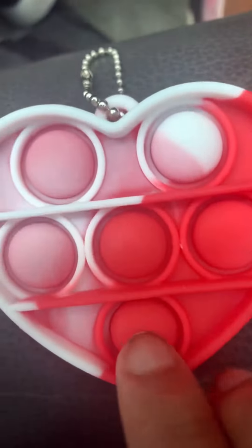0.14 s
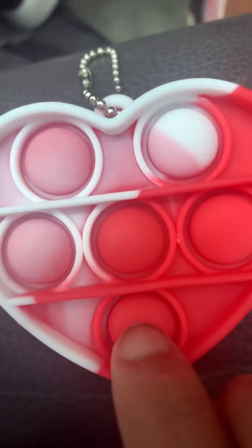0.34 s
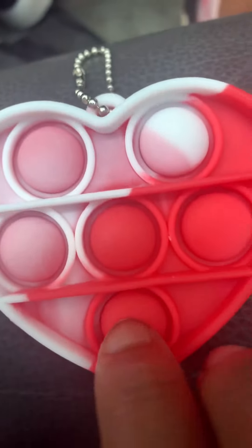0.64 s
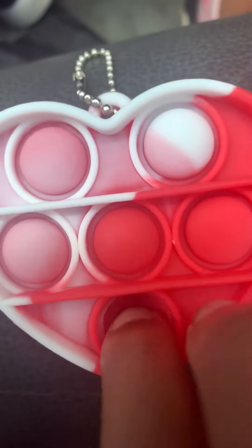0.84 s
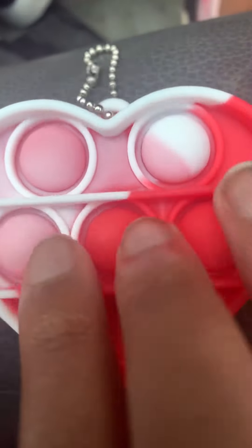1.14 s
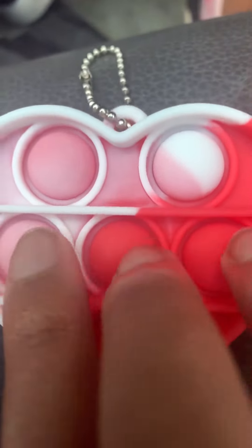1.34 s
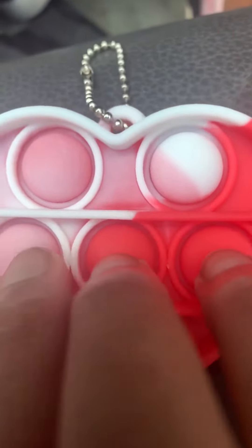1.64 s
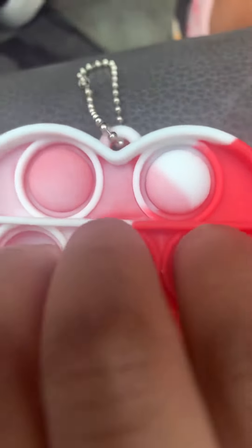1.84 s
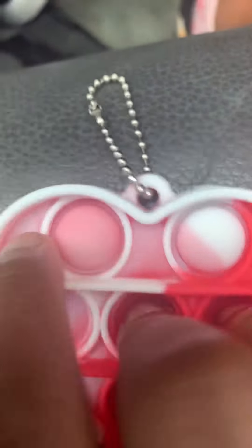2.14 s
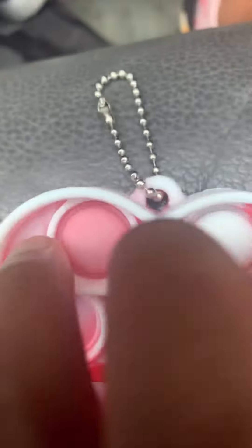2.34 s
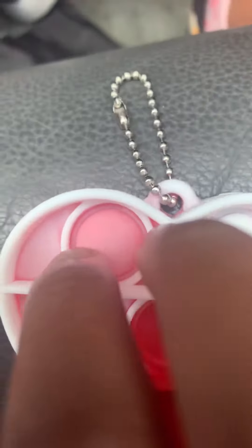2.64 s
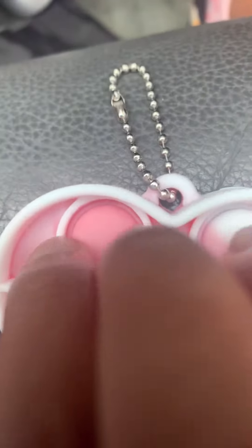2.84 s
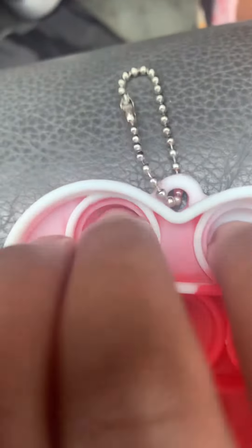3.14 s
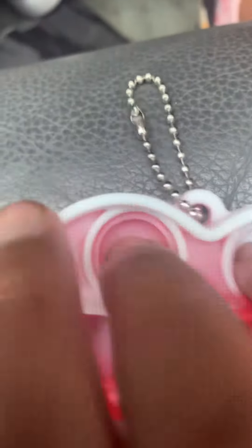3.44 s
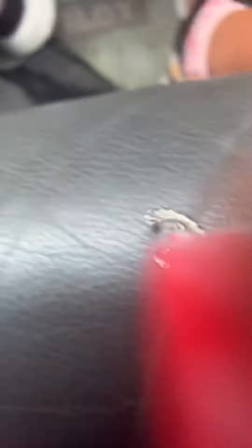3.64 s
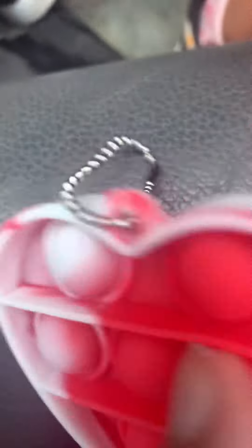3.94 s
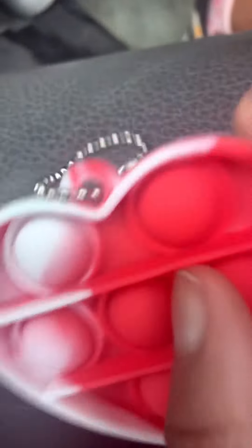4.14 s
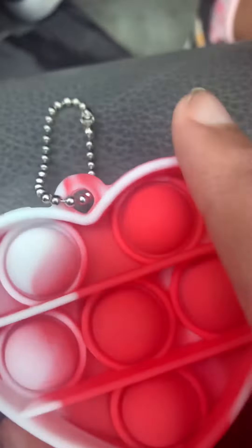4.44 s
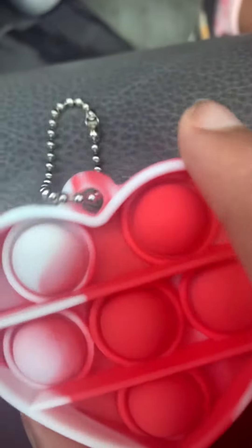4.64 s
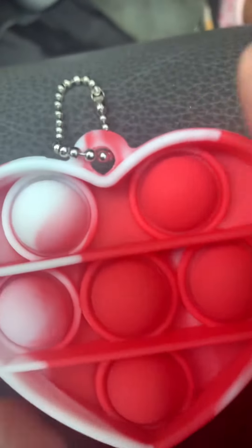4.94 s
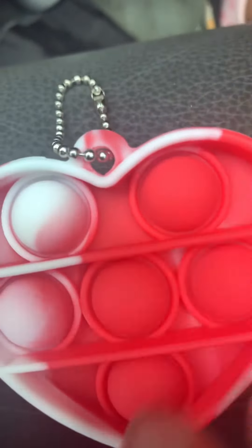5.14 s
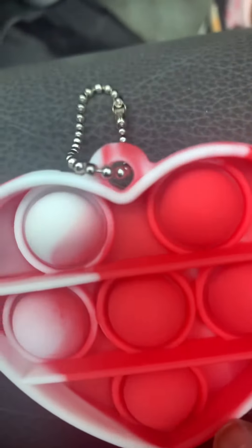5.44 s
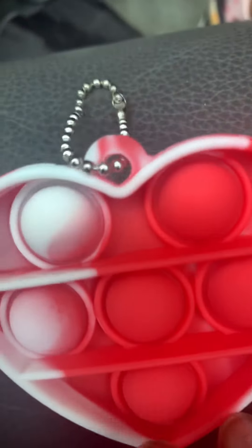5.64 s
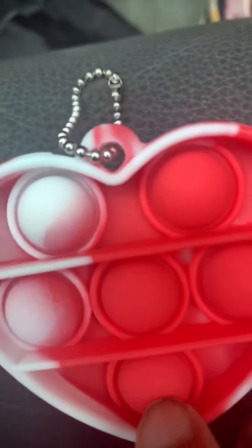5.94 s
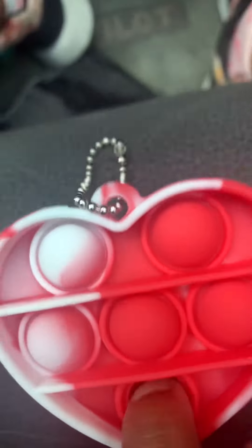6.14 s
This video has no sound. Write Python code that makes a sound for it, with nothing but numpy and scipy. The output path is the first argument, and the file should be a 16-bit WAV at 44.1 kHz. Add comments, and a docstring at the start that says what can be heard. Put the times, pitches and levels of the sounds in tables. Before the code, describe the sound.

Inside an idling car, a loud, low engine hum drones steadily over body rumble and soft vent air. Close to the microphone, fingers pop the bubbles of a silicone fidget toy: one sharp snap, a tight cluster a second later, then a quick pair. After that come only handling sounds, with faint finger rubs, soft knocks and single dry ticks from the toy's bead chain.

```python
"""Fingers pop the bubbles of a silicone fidget toy, close up in an idling car.
Each dome gives, then flips with a snap that rings its little cup and thumps the soft slab.
Between pops the fingers rub the toy, it knocks softly and its bead chain ticks.
Underneath, the engine's firings boom in the cabin over body rumble and vent air."""
import sys
import numpy as np
from scipy import signal
from scipy.fft import rfft, irfft
from scipy.io import wavfile
from scipy.ndimage import uniform_filter1d, minimum_filter1d

SR = 44100
rng = np.random.default_rng(int(sys.argv[2]) if len(sys.argv) > 2 else 0)


def int16_out(signal):
    """Quantize to a 16-bit WAV file."""
    q = np.round(np.clip(np.atleast_2d(signal).T, -1, 1) * 32767)
    wavfile.write(sys.argv[1], SR, q.astype(np.int16))


N = 277389

# Colours of the bed, body rumble and vent air: f/Hz, relative level/dB
RUMBLE_COLOUR = [(20, -27), (35, -11), (55, -7), (90, 2), (130, 0.5), (200, -8.5), (275, -7.5), (340, -10),
                 (450, -16.5), (700, -40.5)]
VENT_COLOUR = [(200, -4), (450, -3), (580, -5), (720, 1), (850, -6), (1000, -5.5), (1220, -10.5),
               (1560, -6.5), (2100, -12.5), (2800, -12.5), (3800, -19.5), (6800, -26), (7500, -23),
               (8000, -29), (11000, -36.5), (13500, -49)]
# Firing rate at idle: t/s, f/Hz
FIRING_RATE = [(0, 37.13), (2.3, 37.15), (2.9, 37.35), (3.6, 37.28), (5.0, 37.25), (6.3, 37.16)]
# Engine orders from the second up: level/dB re BOOM_DB, waver/share of amplitude
BOOM_ORDERS = [(-10.5, 0.26), (1, 0.025), (-8.5, 0.095), (-17, 0.053), (-25, 0.07), (-26.5, 0.5)]
# Air resonances of the cabin: f/Hz, width/Hz
AIR_MODES = [(112, 9.4), (205, 7.1)]
# Colour of the cabin's tail: f/Hz, relative level/dB
TAIL_COLOUR = [(200, 7.5), (2500, -9.5), (7000, -1.5), (14000, -1.5)]

# Finger swishes: peak t/s, half length/s, level/dB, centre f/Hz
SWISHES = [(0.063, 0.06, -52, 7960), (0.19, 0.036, -58.5, 8500), (0.302, 0.021, -61, 9500),
           (2.594, 0.12, -65, 8900), (3.661, 0.02, -53, 6500), (3.689, 0.077, -61, 7500),
           (4.123, 0.056, -46, 2500), (5.1, .07, -67, 9000)]
# Colour of a swish: f/centre f, relative level/dB
SWISH_COLOUR = [(1 / 8, -45), (1 / 2, -8), (1, 0), (1.4, -7), (2, -30), (5, -50)]
# Bead chain ticks: t/s, level/dB
CHAIN_TICKS = [(1.3146, -29), (2.6385, -29), (3.9620, -24.5), (4.1945, -33.5), (5.2855, -19)]
# Soft knocks: t/s, level/dB, t60/s, thud/dB re pat
KNOCKS = [(.9135, -37.5, 0.022, 4), (1.129, -38.5, 0.026, -12), (3.8474, -36, 0.066, 5.5),
          (5.8055, -34, 0.03, -10)]
# Colours of a tick and of a knock's pat and thud: f/Hz, relative level/dB
TICK_COLOUR = [(500, -36), (2000, 7), (5000, 6.5), (9000, 0.5), (13000, -9.5), (15500, -12.5)]
PAT_COLOUR = [(800, -21), (2000, -9), (2600, 4), (3600, -3.5), (5000, -12.5), (9000, -22.5),
              (14000, -45.5)]
THUD_COLOUR = [(150, -14), (480, 10), (900, -17), (4000, -57)]

# The other cups ringing along: f/Hz, t60/s, level/dB re pop
OTHER_CUPS = [(1598, 0.013, -9), (2260, 0.052, -22.5), (3160, 0.0096, -14.5), (6300, 0.012, -20)]
# Colours of the dome's crack and the slack wall's flap: f/Hz, relative level/dB
CRACK_COLOUR = [(300, -11.5), (1100, -6.5), (1700, -14), (2900, -8), (3500, 5.5), (4800, 2), (5700, -2.5),
                (7000, -1.5), (8500, -7.5), (11000, -10.5), (15000, -28)]
FLAP_COLOUR = [(150, -18), (290, -3), (600, 4.5), (1000, -11), (2000, -18)]
# Pops: t/s, level/dB, cup f/Hz, cup t60/s, trims (give/dB, overtone/dB, thump/dB, crack/dB), high cut/Hz
BUBBLE_POPS = [(0.7428, -1.5, 2410, .012, -11, -15, -16, 3, 6550),
               (1.741, -4.5, 2410, 0.013, -5, -10, -12, -0.5, 8000),
               (1.7498, -4, 2470, 0.015, -8.5, -21, -13, -9, 9600),
               (1.7643, 1, 2350, 0.011, -13, -3.5, -12.5, -2, 7600),
               (3.028, -8.5, 2520, 0.01, 3, 8, -8, 5, 10000),
               (3.1331, -4.5, 2450, 0.0073, -19, -12, -8.5, -4, 11200)]

BOOM_DB, SHUDDER_DB, FAN_DB = -17, -36.5, -41
BEAT_S, IN_STEP_S = 1.32, 1.27  # one beat of shudder against fan; a moment when they are in step
GIVE_S, GIVE_DULLING = 0.00238, 0.78  # the give leads the flip, with this share of its high cut
TOP_HZ = 15700


def undb(db):
    """Decibels to gain."""
    return 10 ** (np.asarray(db) / 20)


def unit(x):
    """Scale to rms 1."""
    return x / np.sqrt(np.mean(x ** 2))


def add(out, at, sound):
    """Mix a sound in at a time in seconds."""
    i = int(at * SR)
    out[i:i + len(sound)] += sound[:len(out) - i]


def colour_db(points, size):
    """An EQ curve through (f/Hz, level/dB) points, on FFT bins."""
    hz, db = np.transpose(points)
    return np.interp(np.log(np.arange(size // 2 + 1) * SR / size + 1), np.log(hz), db)


def noise(points, size):
    """Coloured noise, rms 1."""
    return unit(irfft(rfft(rng.standard_normal(size)) * undb(colour_db(points, size)), size))


def click(points, size=512):
    """The tightest causal click of a given colour, peak 1."""
    cepstrum = irfft(np.log(undb(colour_db(points, size))))
    cepstrum[1:size // 2] *= 2  # fold to minimum phase
    cepstrum[size // 2 + 1:] = 0
    pulse = irfft(np.exp(rfft(cepstrum)))
    return pulse / np.abs(pulse).max()


def drift(rate):
    """Smooth random modulation, about rate moves a second, rms 1."""
    hold = int(SR / rate)
    steps = np.repeat(rng.standard_normal(N // hold + 1), hold)
    return unit(uniform_filter1d(uniform_filter1d(steps, hold), hold)[:N])


def fade(t, t60):
    """Exponential decay that loses 60 dB in t60."""
    return np.exp(-np.log(1000) * t / t60)


def ring(t, hz, t60):
    """One struck mode."""
    return np.sin(2 * np.pi * hz * t) * fade(t, t60)


def cabin_air(rumble_db=-28, waver_db=1, vent_db=-41.5, glass_db=-12, glass_t60=.03):
    """The bed: body rumble and the even rush of the vents, coloured by reflections off the windows."""
    t = np.arange(4096) / SR
    rumble = noise(RUMBLE_COLOUR + [(3000, -100)], N) * undb(rumble_db + waver_db * drift(25))
    rush = noise(VENT_COLOUR + [(15000, -65)], N)
    glass = rng.standard_normal(len(t)) * fade(t, glass_t60) * (1 - fade(t, glass_t60))
    rush += undb(glass_db) * unit(signal.fftconvolve(rush, glass)[:N])
    return rumble + unit(rush) * undb(vent_db)


def engine():
    """The cabin passes only the low orders of the firings; the third booms on an air resonance."""
    t = np.arange(N) / SR
    rate = np.interp(t, *np.transpose(FIRING_RATE))
    turns = np.cumsum(rate) / SR + 0.0012 * drift(8.1)  # firings come slightly early or late
    # the shudder beats with a slightly slower shake, perhaps the radiator fan
    fan_turns = turns - (t - IN_STEP_S) / BEAT_S
    out = undb(SHUDDER_DB) * np.sin(2 * np.pi * turns) + undb(FAN_DB) * np.sin(2 * np.pi * fan_turns)
    for order, (db, waver) in enumerate(BOOM_ORDERS, 2):
        hz = order * rate.mean()
        # orders above a resonance trail those below it
        lag = sum(np.arctan2(hz * width, mode_hz ** 2 - hz ** 2) for mode_hz, width in AIR_MODES)
        level = undb(BOOM_DB + db) * (1 + waver * drift(7))
        out += level * np.sin(2 * np.pi * order * turns - lag)
    return np.sqrt(2) * out


def cabin_reverb(x, echo_s=.004, echo_db=-11, tail_db=-15, tail_t60=0.076):
    """One early reflection, then the short tail of an upholstered space."""
    t = np.arange(8192) / SR
    response = noise(TAIL_COLOUR, len(t)) * fade(t, tail_t60) * (1 - fade(t, 0.01))
    response *= undb(tail_db) / np.sqrt(np.sum(response ** 2))
    add(response, echo_s, undb(echo_db) * np.array([1, 2, 1]) / 4)
    return x + signal.fftconvolve(x, response)[:N]


def finger_rubs(grain_db=2.5):
    """Skin slides on silicone in soft, grainy swishes."""
    out = np.zeros(N)
    for at, half_s, db, hz in SWISHES:
        size = int(2 * half_s * SR)
        swish = noise([(hz * ratio, level) for ratio, level in SWISH_COLOUR], size)
        grain = undb(grain_db * rng.standard_normal(size // 32 + 1)).repeat(32)[:size]
        envelope = np.hanning(size) * uniform_filter1d(grain, 32)
        add(out, max(at - half_s, 0), undb(db) * envelope * swish)
    return out


def toy_knocks():
    """The soft toy knocks on leather or a finger: a bright pat over a low thud."""
    out, t = np.zeros(N), np.arange(4096) / SR
    for at, db, t60, thud_db in KNOCKS:
        pat = noise(PAT_COLOUR, len(t))
        thud = undb(thud_db) * noise(THUD_COLOUR, len(t))
        envelope = fade(t, t60) * (1 - fade(t, 0.002))
        add(out, at, undb(db) * envelope * (pat + thud))
    return out


def bead_chain():
    """The beads strike in single dry ticks."""
    out = np.zeros(N)
    for at, db in CHAIN_TICKS:
        add(out, at, undb(db) * click(TICK_COLOUR))
    return out


def dive(t, start_hz, end_hz, glide_s, t60):
    """A struck mode whose pitch sinks as the rubber slackens."""
    turns = end_hz * t + (start_hz - end_hz) * glide_s * (1 - np.exp(-t / glide_s))
    return np.sin(2 * np.pi * turns) * fade(t, t60)


def soften(x, hz):
    """High cut: a slower flip under the fingertip sounds duller."""
    return signal.sosfilt(signal.butter(4, min(hz, TOP_HZ), fs=SR, output="sos"), x)


def bubble_pops(stretch=1.09, overtone_ratio=1.62, rasp_db=-7, give_crack_db=-6,
                wall_db=-3, flap_db=-9, slab_db=-19):
    """A dome gives, then flips with a crack and rings the air in its cup; wall and slab add weight."""
    out, t = np.zeros(N), np.arange(4096) / SR
    wall = undb(wall_db) * dive(t, start_hz=1556, end_hz=400, glide_s=0.00273, t60=0.039)
    wall *= 1 - fade(t, 0.0092)  # soft attack
    other_cups = sum(undb(db) * ring(t, hz, t60) for hz, t60, db in OTHER_CUPS)
    slab = undb(slab_db) * ring(t, hz=288, t60=0.043)
    for at, db, hz, t60, give_db, overtone_db, thump_db, crack_db, top_hz in BUBBLE_POPS:
        cup = dive(t, hz * stretch, hz, glide_s=0.002, t60=t60)
        cup += undb(overtone_db) * ring(t, hz * overtone_ratio, t60=0.008)
        crack = undb(rasp_db) * noise(CRACK_COLOUR, len(t)) * fade(t, t60=.007)
        add(crack, 0, click(CRACK_COLOUR))
        give = ring(t, hz, t60=0.0084) + undb(give_crack_db) * crack
        flap = undb(flap_db) * noise(FLAP_COLOUR, len(t)) * fade(t, t60=0.048)
        flip = cup - other_cups + slab + undb(thump_db) * (wall + flap) + undb(crack_db) * crack
        add(out, at - GIVE_S, undb(db + give_db) * soften(give, GIVE_DULLING * top_hz))
        add(out, at, undb(db) * soften(flip, top_hz))
    return out


def scene():
    """The toy up front, over the idling car, in mono."""
    car = engine() + cabin_air()
    toy = bubble_pops() + bead_chain() + finger_rubs() + toy_knocks()
    return (car + cabin_reverb(toy))[None]


def record(dry, ceiling=.95):
    """A limiter ducks briefly around the tallest peaks; a steep high cut follows."""
    gain = np.minimum(1, ceiling / (np.abs(dry) + 1e-9))
    gain = uniform_filter1d(minimum_filter1d(gain, size=221), size=221)  # hold and smooth over 5 ms
    return signal.sosfilt(signal.ellip(8, .2, 70, TOP_HZ, fs=SR, output="sos"), dry * gain)


dry = scene()
out = record(dry)
int16_out(out)
```